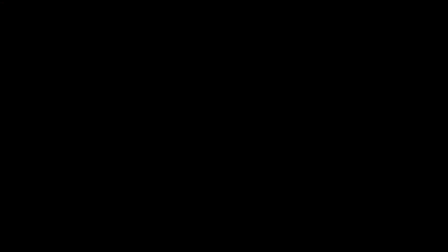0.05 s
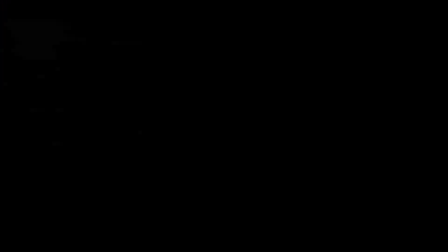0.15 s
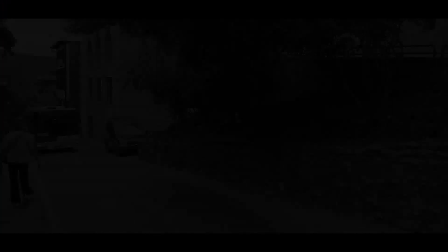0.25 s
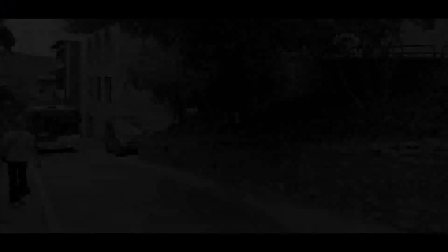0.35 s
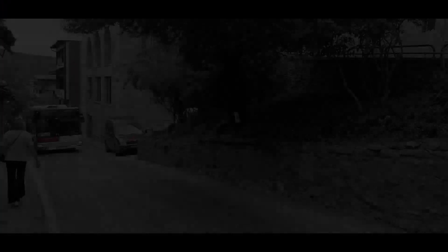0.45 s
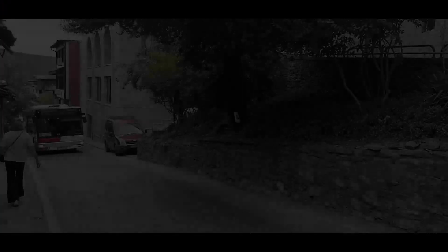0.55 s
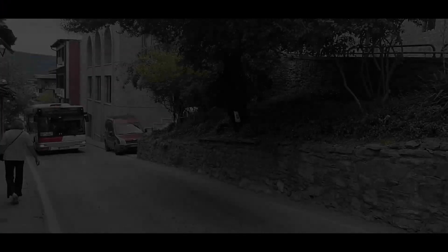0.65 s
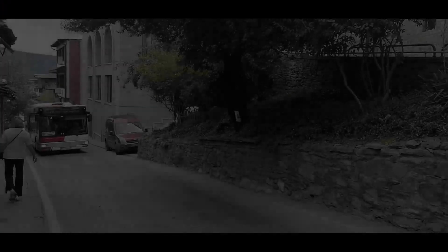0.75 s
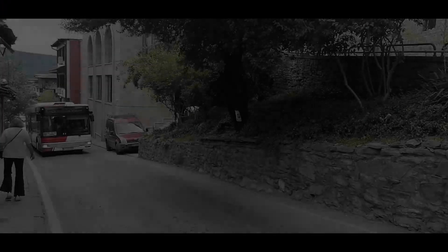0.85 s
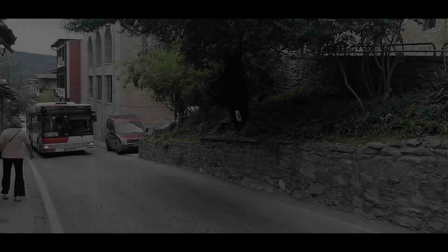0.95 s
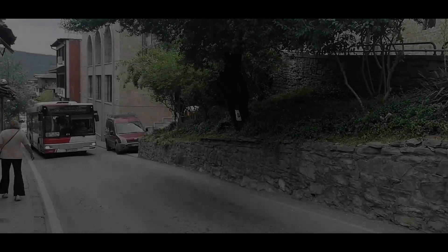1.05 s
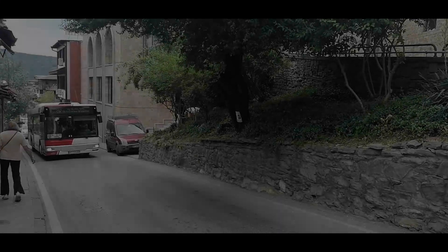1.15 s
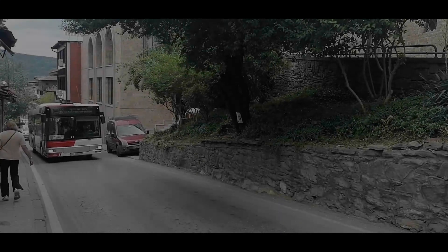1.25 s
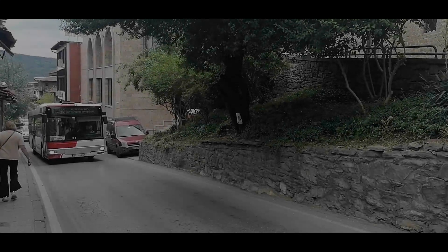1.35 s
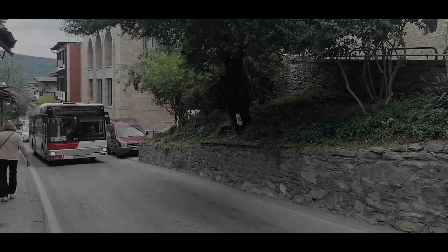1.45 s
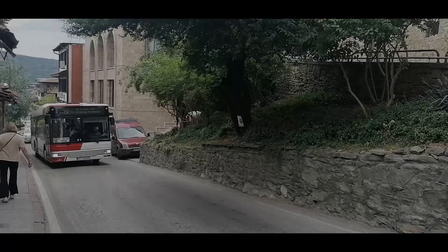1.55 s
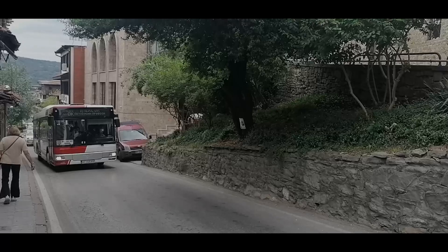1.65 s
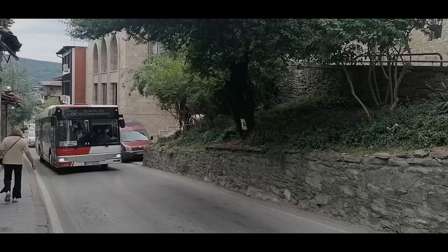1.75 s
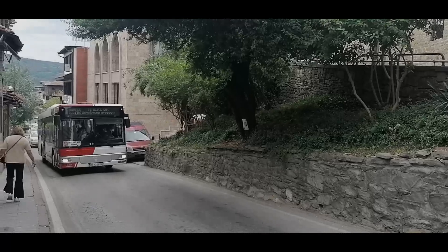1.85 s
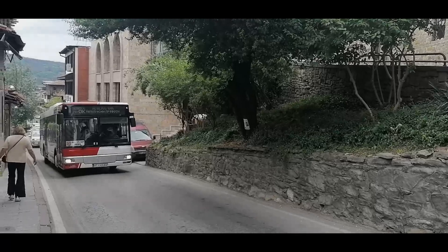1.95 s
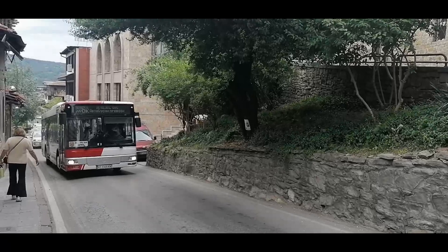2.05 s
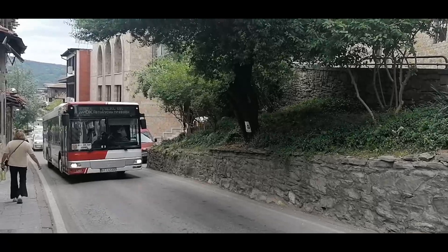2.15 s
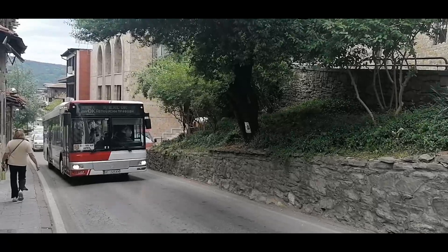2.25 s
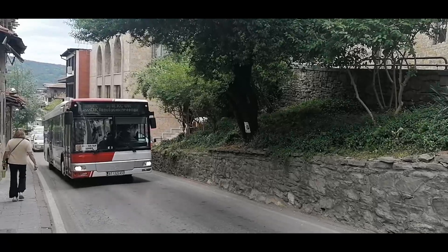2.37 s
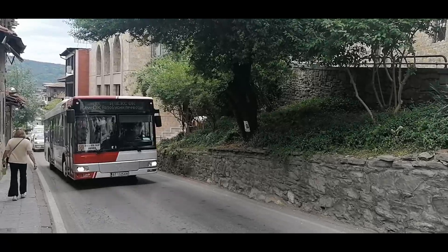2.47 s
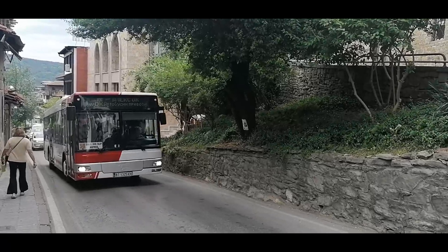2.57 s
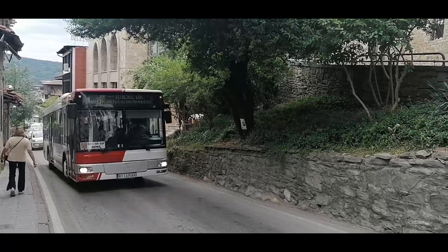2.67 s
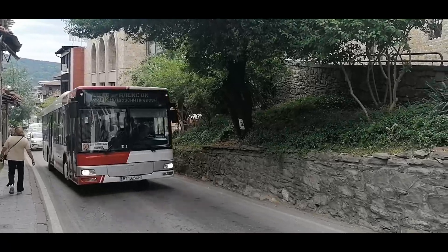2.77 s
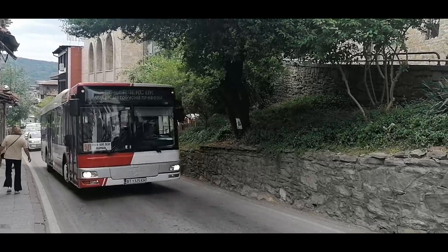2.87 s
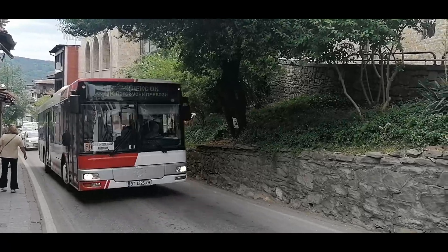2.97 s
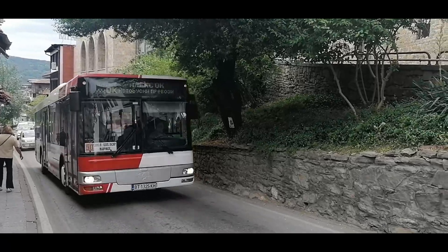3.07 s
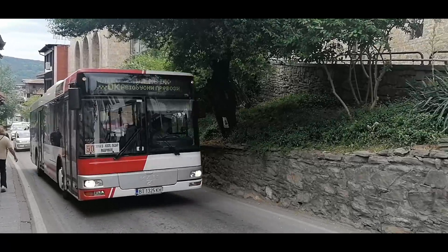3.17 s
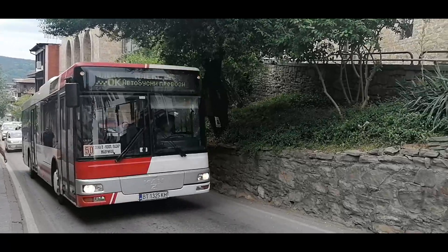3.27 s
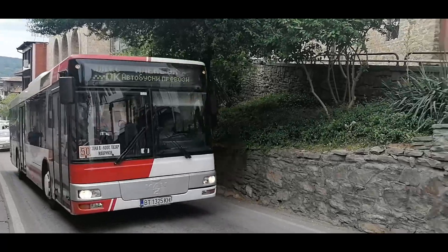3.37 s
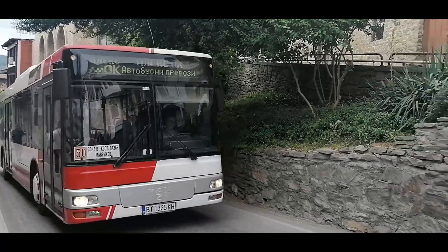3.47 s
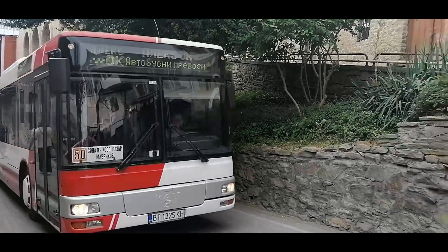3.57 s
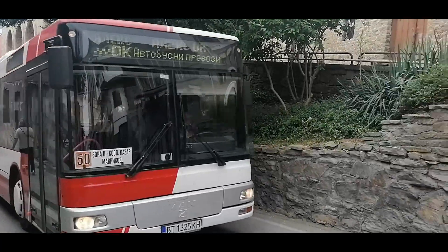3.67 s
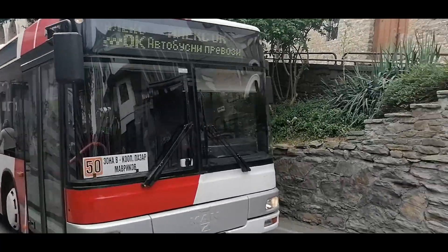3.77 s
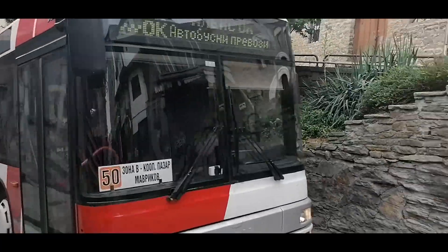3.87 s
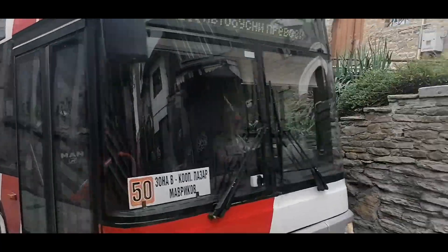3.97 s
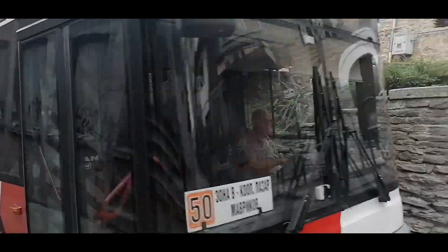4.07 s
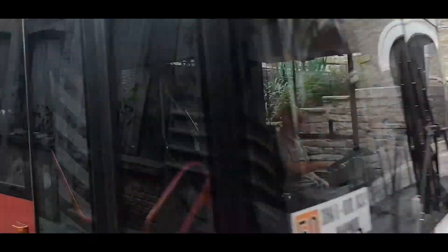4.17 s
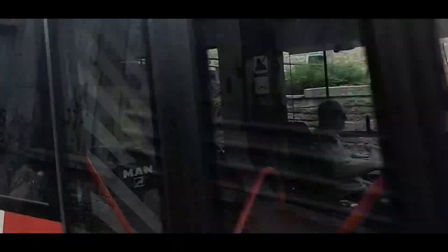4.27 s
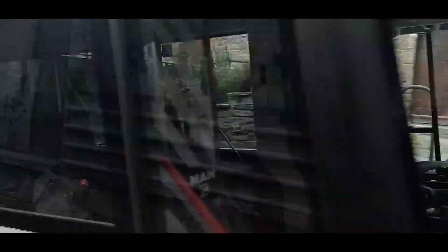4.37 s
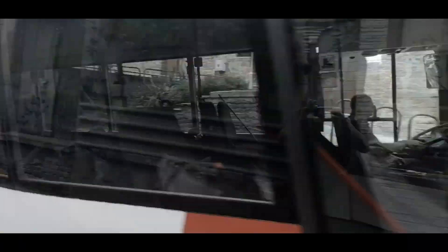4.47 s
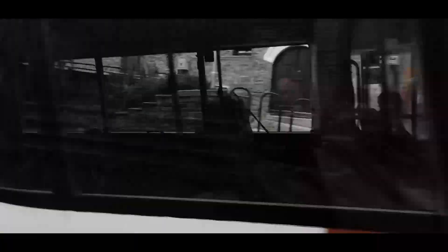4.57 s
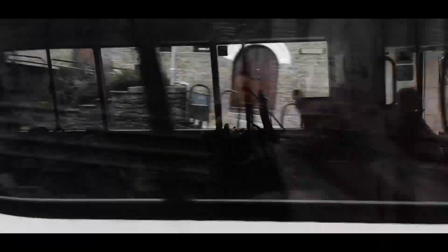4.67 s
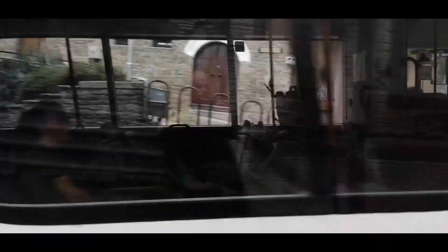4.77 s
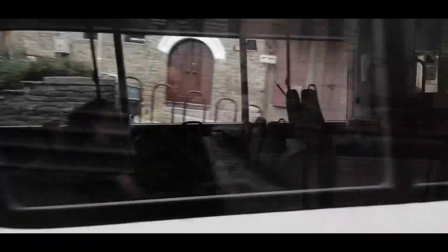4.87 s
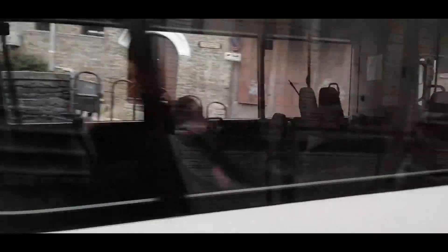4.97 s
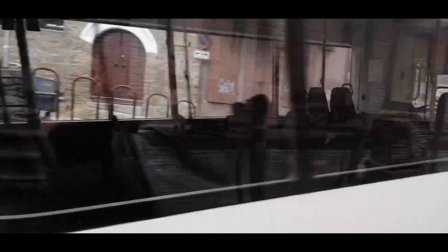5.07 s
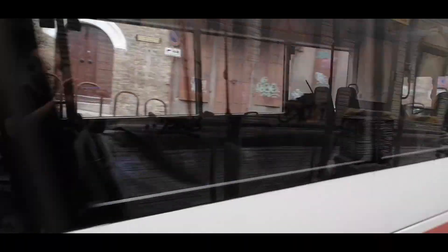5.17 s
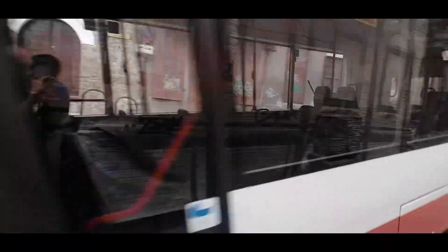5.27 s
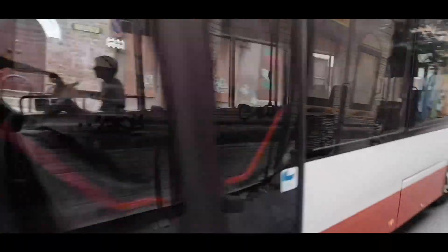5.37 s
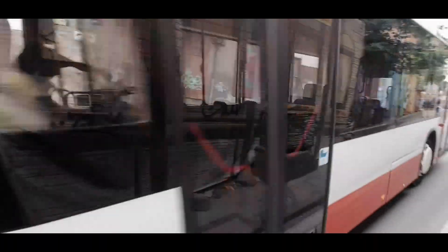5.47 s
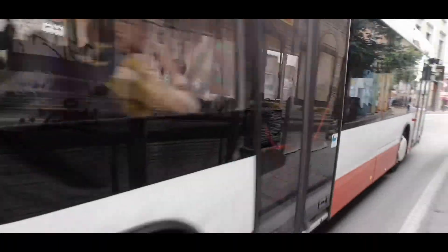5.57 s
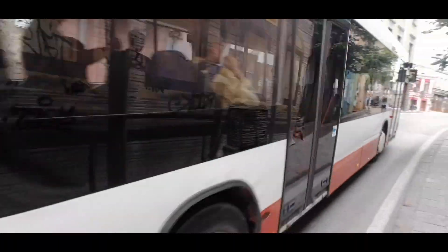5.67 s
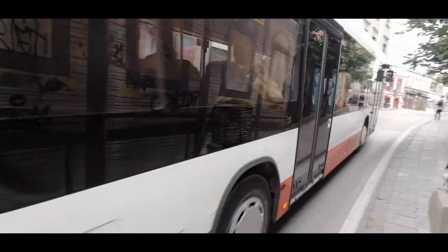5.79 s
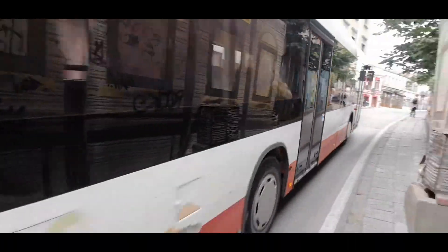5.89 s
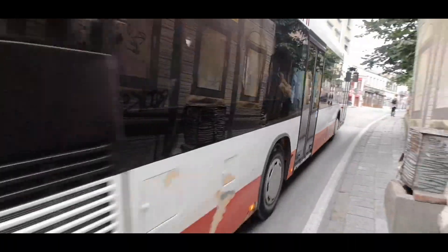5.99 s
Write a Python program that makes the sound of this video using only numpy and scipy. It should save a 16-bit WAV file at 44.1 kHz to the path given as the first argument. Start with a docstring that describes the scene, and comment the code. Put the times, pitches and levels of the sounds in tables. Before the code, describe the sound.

From silence, the sound fades in gradually over the first three seconds. A diesel city bus approaches on a narrow walled street, mostly to the left, above very faint steady traffic. Its wavering exhaust drone rises in pitch until about 2 s, with a rising fan hum, a thin high whistle and intake hiss. A low labouring roar and blurred gear tones peak near 2.3 s; at 2.6 s the engine eases and drops in pitch for an upshift, with faint air spits. Stronger short spits come at 3.4 and 3.7 s. Hollow body thuds fall near 2.5, 3 and 4 s, and small diesel knocks around 4.6 and 5.1 s. From 4 s the side slides past closely: boom, mid roar, clatter, tyre hiss and panel drone grow. By 5.5 to 6 s the rear grille's rasp and a sinking fan howl are loudest, more centred, then it stops abruptly but softly.

```python
"""A diesel city bus nears along a narrow walled street, fading in from silence with faint, steady distant noise.
Exhaust and fan hum, the turbo whistles; a labouring roar and gear tones swell before the upshift, with faint
spits of air; stronger spits come about a second after. Clatter, rasp and tyre hiss grow with the nearing rear.
Tones are wavering shaft orders, roars are coloured noise; sliding wall echoes comb the roars.
Two microphone ports hear it, the left one first and mostly louder."""
import sys
import numpy as np
from scipy import signal
from scipy.fft import rfft, irfft
from scipy.io import wavfile
from scipy.ndimage import uniform_filter1d, minimum_filter1d, map_coordinates

SR = 44100
rng = np.random.default_rng(int(sys.argv[2]) if len(sys.argv) > 2 else 0)


def master_out(mix):
    """Clip the mix to full scale and print it as 16-bit PCM to the path in sys.argv[1]."""
    frames = np.transpose(np.atleast_2d(mix))
    ceiling = np.clip(frames, -1, 1)
    pcm = np.round(ceiling * 32767).astype(np.int16)
    wavfile.write(sys.argv[1], SR, pcm)


N = 265923
TIME = np.arange(N) / SR
BINS = np.fft.rfftfreq(N, 1 / SR)


def undb(db):
    """Decibels to gain."""
    return 10 ** (np.asarray(db) / 20)


def curves(table):
    """Each column of a table, joined by straight lines in time."""
    s, *columns = np.transpose(table)
    return [np.interp(TIME, s, c) for c in columns]


def along(points):
    """Points joined on a log-frequency axis."""
    hz, value = np.transpose(points)
    return np.interp(np.log(np.maximum(BINS, 1)), np.log(hz), value)


def walk(rate_hz):
    """Smooth chance that changes about rate_hz times a second; spread 1."""
    knots = rng.standard_normal(4096)
    size = max(int(SR / rate_hz), 1)
    y = uniform_filter1d(np.interp(TIME * rate_hz, np.arange(len(knots)), knots), size)
    return y / y.std()


def turns(hz):
    """Phase in radians of something that turns hz times a second."""
    return 2 * np.pi * np.cumsum(hz) / SR


# port balance: (frequency [Hz], left minus right [dB])
BALANCE_DB = [(60, 7), (110, 7.2), (200, 8), (275, 9.9), (370, 10), (690, 9.5), (1150, 3.9), (1700, 4.2),
              (2900, -1), (4000, 0), (5000, -3), (7000, 0.5), (8700, 4.3), (11000, -.5), (14000, .5)]
# port likeness: (frequency [Hz], likeness [0-1])
LIKENESS = [(100, .975), (290, .975), (420, .9), (550, .77), (720, .8), (950, .6), (1700, .62), (1950, .3),
            (2400, .36), (3100, .15), (12000, .15)]
# lag of the right port: (frequency [Hz], lag [ms])
PORT_LAG_MS = [(300, .18), (500, .25), (900, .25), (1100, .33), (1800, .34), (2500, .39), (6000, .38)]


def ports(direct, scattered, colour=1):
    """Sound reaches the left port first; the walls make the treble unlike on the two sides. Level 1."""
    like = np.clip(along(LIKENESS), 0, 1)
    left = rfft(direct)
    delay = np.exp(-2j * np.pi * BINS * along(PORT_LAG_MS) / 1000)
    right = like * left * delay + np.sqrt(1 - like ** 2) * rfft(scattered)
    lean = undb(along(BALANCE_DB))
    pair = irfft(np.array([left * lean, right]) * colour / np.hypot(lean, 1), N)
    return pair / pair.mean(axis=0).std()


def rush(points, envelope):
    """Turbulence under an envelope, coloured and heard at both ports."""
    inside = (BINS > points[0][0]) & (BINS < points[-1][0])
    direct, scattered = rng.standard_normal((2, N)) * envelope
    return ports(direct, scattered, undb(along(points)) * inside)


def hum(phase, lines, waver, rate_hz):
    """Whole and half orders of one shaft; shifting reflections make each waver in strength and phase."""
    out = 0
    for order, db in lines:
        angle = np.round(2 * order) / 2 * phase
        in_phase = np.cos(angle) * (1 + waver * walk(rate_hz))
        quadrature = np.sin(angle) * waver * walk(rate_hz)
        out = out + undb(db) * (in_phase + quadrature)
    return out


def blurred_hum(phase, lines, waver, rate_hz):
    """Separately wavering hums as direct and scattered sound. Level 1."""
    direct, scattered = (hum(phase, lines, waver, rate_hz) for _ in range(2))
    return ports(direct, scattered)


def howl(table, rate_hz):
    """A tone wavers so fast that it rings as a narrow, moving band; rate_hz sets its width."""
    hz, db = curves(table)
    return blurred_hum(turns(hz), [(1, 0)], waver=3, rate_hz=rate_hz) * undb(db)


def bursts(table, rise_s, decay_s):
    """Envelope of sharp blows that peak at the given times and die away."""
    out = 0
    for s, db in table:
        rise = np.clip((TIME - s) / rise_s + 1, 0, 1)
        out = out + undb(db) * rise * np.exp(-np.maximum(TIME - s, 0) / decay_s)
    return out


SPEED_M_S, ABREAST_S, LANE_M = 4.99, 6.582, 3.71  # LANE_M: engine distance when abreast


def to_come():
    """Metres that the engine has yet to travel until it is abreast."""
    return SPEED_M_S * (ABREAST_S - TIME)


def distance():
    """Metres from the engine to the listener."""
    return np.hypot(to_come(), LANE_M)


# view of the engine grille: (time [s], 0 ahead - 1 side on)
SIDE_ON = [(0, 0.034), (2.4, 0.085), (3.5, 0.066), (4.1, 0.88), (5.2, 1), (6.03, 0.94)]


def passing(table, sound):
    """A sound changes from its colour heard from ahead to that heard from the side."""
    side = np.clip(curves(SIDE_ON)[0], 0, 1)
    rows = np.array(table)
    return np.sqrt(1 - side) * sound(rows[:, [0, 1]]) + np.sqrt(side) * sound(rows[:, [0, 2]])


def roar(table, envelope):
    """Turbulence on the moving bus."""
    return passing(table, lambda points: rush(points, envelope))


# part: (abreast [dB], loss per doubling of distance [dB], hidden by the bus from ahead [dB])
CARRY = {"rasp": (-28, 4.27, 0), "boom": (-16, 5.6, 1.26), "bay": (-18.5, 5.34, 7.1),
         "overtones": (-21.5, 5.87, 5), "clatter": (-26, 4.93, 5.7), "tyres": (-36.5, 5.93, 3.1),
         "intake": (-49.5, 2.34, 0)}


def carried(part):
    """Gain of one part: it grows as the bus nears and as its side comes into view."""
    db, doubling_db, hidden_db = CARRY[part]
    return undb(db - doubling_db * np.log2(distance() / LANE_M) - hidden_db * (1 - curves(SIDE_ON)[0]))


FLARE_S, FLARE_WIDTH_S, FLARE_DB = 2.27, 0.27, 0.5
SHIFT_S, EASE_S, EASE_DB = 2.58, 0.25, 1.5  # middle of the gear change


def flaring():
    """How near the engine is to the top of the gear, 0-1."""
    return np.exp(-((TIME - FLARE_S) / FLARE_WIDTH_S) ** 2)


def throttle():
    """The engine flares at the top of the gear and eases off briefly for the change."""
    return undb(FLARE_DB * flaring() - EASE_DB * np.exp(-((TIME - SHIFT_S) / EASE_S) ** 2))


# engine speed: (time [s], firing rate [Hz])
ENGINE = [(0, 74.4), (.35, 75.1), (.9, 81.35), (1.4, 83.15), (2.0, 86.43), (2.35, 84.9), (2.65, 75.84),
          (2.95, 68.1), (3.5, 67.73), (4.3, 68.9), (5.2, 69.25), (6.03, 69.45)]


def firing_phase():
    """Firing phase in radians, three firings a crank turn, slightly unsteady."""
    return turns(curves(ENGINE)[0] * (1 + 0.003257 * walk(8)))


def knocks(firing, sharpness):
    """Every firing shakes the block with its own strength, sinking towards the next."""
    cycle = firing / (2 * np.pi)
    strength = undb(4 * rng.standard_normal(1024))
    return 1 + sharpness * strength[cycle.astype(int)] * np.exp(-(cycle % 1) / 0.58)


# cars following far behind: (frequency [Hz], relative level [dB/Hz])
TRAFFIC = [(250, 13), (320, -6), (420, -32), (700, 6.5), (1000, 10), (1300, -8), (1800, -10), (3000, -15),
           (5000, -34)]
TRAFFIC_DB = -45


def traffic():
    """Steady coloured noise of the cars following far behind."""
    return rush(TRAFFIC, 1) * undb(TRAFFIC_DB)


# (time [s], firing line [dB], its octave [dB]), before the trims below
EXHAUST = [(0.28, -36, -37), (0.46, -23, -36), (0.61, -47, -53.0), (0.73, -27, -55), (0.94, -48, -48),
           (1.42, -28.5, -42), (1.54, -60, -47), (1.66, -29, -38), (1.87, -44, -37), (1.99, -26, -35),
           (2.12, -38, -35), (2.26, -20.5, -35.5), (2.46, -38.5, -41), (2.65, -30, -58), (2.77, -55, -37.0),
           (3.1, -41, -38), (3.4, -27.5, -37.5), (3.52, -46, -43), (3.73, -27, -42), (4.0, -39, -35.5),
           (4.06, -34, -34.5), (4.63, -37.5, -37.5), (4.72, -28, -32.5), (4.96, -34.5, -42),
           (5.17, -36, -43), (5.98, -40, -25)]
DRONE_TRIM_DB, OCTAVE_TRIM_DB = -2, 0.5
# crank lines: (order [x crank rate], moving off [dB], after the change [dB])
CRANK = [(1, -53, -57), (2, -55, -54.5), (4, -43.5, -45.5), (4.5, -34, -47), (5, -49, -48), (8, -44, -41)]
MOVING_OFF_S = 0.46


def exhaust(firing):
    """The firing line and its octave drone over crank lines, whose pattern shifts up to the gear change."""
    shifted = np.clip((TIME - MOVING_OFF_S) / (SHIFT_S - MOVING_OFF_S), 0, 1)
    crank = firing / 3
    crank_lines = [(order, pulling + shifted * (cruising - pulling)) for order, pulling, cruising in CRANK]
    first, octave = curves(EXHAUST)
    firing_lines = [(1, first + DRONE_TRIM_DB), (2, octave + OCTAVE_TRIM_DB)]
    drone = hum(firing, firing_lines, waver=.22, rate_hz=24)
    drone = np.sqrt(2) * (drone + hum(crank, crank_lines, waver=.7, rate_hz=22))
    return ports(drone, drone) * drone.std()


# cooling fan: (time [s], blade rate [Hz])
FAN = [(0, 213.5), (.3, 224), (.6, 235.5), (.95, 244.6), (1.3, 246), (1.65, 256.9), (2, 264.1),
       (2.35, 264.3), (3.05, 266.9), (3.75, 268.9), (4.1, 270), (4.8, 270.1), (5.15, 271.4), (5.5, 269.2),
       (5.85, 266.3), (6.03, 259.8)]
# blade tone, before HUM_TRIM_DB: (time [s], level [dB])
HUM = [(0.28, -29.5), (0.49, -45), (0.76, -33.5), (0.85, -51), (0.94, -33), (1.54, -36), (1.6, -32.5),
       (1.81, -35.5), (1.87, -28.5), (2.35, -40.5), (2.47, -26), (2.59, -45), (2.77, -25), (2.89, -28),
       (2.98, -36), (3.07, -27), (3.13, -31.5), (3.4, -23.5), (3.46, -35), (3.55, -23.5), (3.64, -25.5),
       (3.79, -21.5), (3.88, -43), (3.98, -30), (4.21, -33), (4.29, -21), (4.75, -38), (4.99, -16.5),
       (5.08, -18), (5.17, -26), (5.26, -14.5), (5.38, -32.5), (5.62, -17.5), (5.98, -25.5)]
HUM_TRIM_DB = -0.5
# overtones: (order [x blade rate], ahead [dB], side [dB]), before carry and trim
FAN_LINES = [(2, -10.5, -6.5), (3, -15, -9), (4, -15, -13), (5, -10.5, -36), (6, -29, -14.5), (7, -38, -19),
             (8, -40, -16.5), (9, -32, -16), (10, -45, -22), (12, -26, -26)]
# overtone trim, constant: (time [s], level [dB])
OVERTONE_TRIM = [(5.3, -1.5), (5.8, -1.5)]
# octave that sings out around the gear change: (time [s], level [dB])
FAN_OCTAVE = [(1.9, -68), (2.25, -50), (2.6, -49), (2.75, -46), (3.05, -45.5), (3.25, -65), (4, -74)]


def fan():
    """The blade tone carries round the bus; its overtones come out of the grille with the engine bay's roar."""
    blades = turns(curves(FAN)[0] * (1 + .0035 * walk(14)))
    tone = hum(blades, [(1, 0)], waver=.33, rate_hz=55)
    octave = hum(blades, [(2, 0)], waver=.55, rate_hz=30)

    def overtones(lines):
        """The overtones as the two ports hear them, at their summed power."""
        return blurred_hum(blades, lines, waver=1.1, rate_hz=26) * np.linalg.norm(undb(lines[:, 1]))

    grille = passing(FAN_LINES, overtones) * carried("overtones") * undb(curves(OVERTONE_TRIM)[0])
    low = ports(tone, tone) * undb(curves(HUM)[0] + HUM_TRIM_DB)
    return low + ports(octave, octave) * undb(curves(FAN_OCTAVE)[0]) + grille


# (time [s], centre [Hz], level [dB])
HOWL = [(0, 300, -39.5), (2.3, 305, -51), (3.3, 318, -31.5), (3.9, 308.4, -31), (4.4, 300, -48),
        (5.35, 285, -39), (5.6, 262, -22), (5.9, 236.2, -22), (6.03, 240, -19.5)]


def fan_howl():
    """Churned air howls roughly round the fan tone, sinking as the rear draws level."""
    return howl(HOWL, rate_hz=55)


# (time [s], centre [Hz], level [dB])
WHINE = [(1, 2150, -55), (2.3, 2360, -58), (2.8, 2411, -52), (3.1, 2500, -53), (3.6, 2507, -54),
         (4.3, 2452, -49), (5.2, 2400, -50), (6.03, 2380, -48)]


def transmission_whine():
    """Transmission teeth whine in a blurred, drifting band."""
    return howl(WHINE, rate_hz=230)


# (frequency [Hz], ahead [relative dB/Hz], side [relative dB/Hz])
RUMBLE = [(12, -32, -4), (24, -2, 7.5), (45, -0.5, 9), (65, 4, 4.5), (92, -3.5, 3.5), (114.1, 3.5, 6.5),
          (145, -3.5, 11.5), (228, -26, -26)]
# (time [s], level [dB])
RUMBLE_DB = [(0, -54), (1.1, -45), (1.22, -35.5), (1.7, -36.5), (2.2, -34), (2.8, -32.5), (3.3, -35.5),
             (4.3, -28), (5.1, -27.5), (6.03, -27.5)]


def rumble():
    """Deep turbulence of the bus."""
    return roar(RUMBLE, 1) * undb(curves(RUMBLE_DB)[0])


def lope(firing):
    """The boom flutters unevenly, about once a crank turn."""
    crank = firing / 3 + 1.2 * walk(9)
    return undb(1.8 * np.cos(crank) + 1.0 * walk(35))


# (frequency [Hz], ahead [relative dB/Hz], side [relative dB/Hz])
BOOM = [(100, -40, -16), (144, 1, -7.5), (172, 6, -4), (203, 1, -2), (239, 6.5, 3.5), (312, -1, 1.5),
        (347, -1.5, 0), (396, -9.5, -2.5), (503, -28, -33), (670, -40, -38)]


def boom(firing, shake):
    """Low noise shaken by the firings and fluttering with the crank."""
    return roar(BOOM, shake) * carried("boom") * lope(firing)


# (frequency [Hz], ahead [relative dB/Hz], side [relative dB/Hz])
BAY = [(281, -43, 11), (370, -1, -8), (427, -1, 6.5), (465, 3, 8.5), (560, -2, 5), (625, 4, 4),
       (626, 3.5, 4), (805, 3.5, 7), (860, -1, 2.5), (990, -3.5, 2.5), (1285, -21, -2.5), (1756, -6, -32)]


def engine_bay(shake):
    """Mid-range roar of the engine bay, shaken by the firings."""
    return roar(BAY, shake) * carried("bay")


def gear_whine(firing, whine_db=-15):
    """The teeth of the timing gears mesh 64 times a crank turn, blurred into a wavering band."""
    mesh = firing * 64 / 3
    return undb(whine_db) * blurred_hum(mesh, [(1, 0)], waver=3, rate_hz=190)


# (frequency [Hz], ahead [relative dB/Hz], side [relative dB/Hz])
CLATTER = [(925, -50, -11), (1095, 6.5, 0), (1540, 6.5, 6), (1690, -4.5, 1.5), (2000, 2, 2),
           (2260, -5, 1.5), (2450, -2, 0.5), (2980, -7.5, -3.5), (3400, -13.5, -6.5), (3790, -13, -8),
           (5440, -39, -53)]


def clatter(firing, shake):
    """Gritty noise shaken by the firings, with the timing gears' whine."""
    grit = undb(.6 * walk(110))
    return (roar(CLATTER, shake * grit) + gear_whine(firing)) * carried("clatter")


# (frequency [Hz], ahead [relative dB/Hz], side [relative dB/Hz])
TYRES = [(2750, 8, -25), (3960, 1.5, 1), (4630, 1.5, 1), (5600, -1, 0), (5940, -3.5, -1.5),
         (7440, -3, -2.5), (8350, -10, -11), (9160, -5.5, -6), (10560, -14, -15.5), (11700, -16, -17.5),
         (15000, -35, -30)]


def tyres():
    """Tyre hiss: bright noise with a slight unsteadiness."""
    return roar(TYRES, undb(0.079 * walk(19.83) + .5 * walk(160))) * carried("tyres")


# whistle: (time [s], frequency [Hz], level [dB])
TURBO = [(.3, 8400, -86.5), (.6, 9050, -76), (.87, 9440, -69.5), (1.03, 9850, -79), (1.27, 10450, -80),
         (1.6, 11100, -79), (2.2, 11500, -90), (2.8, 10800, -130)]
# intake hiss: (frequency [Hz], relative level [dB/Hz])
INTAKE = [(3200, -1), (4800, 7), (6800, -1.5), (8200, -23), (10500, -13), (14500, -33)]
SPOOL_S, SPOOL_WIDTH_S, SPOOL_DB = 1.25, 0.18, 2.5  # half way, width, how much weaker the hiss starts


def turbo(rundown_s=0.2):
    """A thin, unsteady whistle climbs while the engine pulls; the intake hisses until just after the change."""
    hz, db = curves(TURBO)
    blades = turns(hz * (1 + .013 * walk(200)))
    whistle = blurred_hum(blades, [(1, 0)], waver=1.5, rate_hz=400) * undb(db)
    spooling = undb(-SPOOL_DB * (1 - np.tanh((TIME - SPOOL_S) / SPOOL_WIDTH_S)) / 2)
    boost = spooling * np.exp(-np.maximum(TIME - SHIFT_S, 0) / rundown_s)
    return whistle + rush(INTAKE, 1) * boost * carried("intake")


# (time [s], pitch [Hz], level [dB], Gaussian half-width [s])
THUDS = [(1.233, 307, -36.5, 0.055), (2.501, 299, -27.5, 0.017), (2.961, 185, -29.5, 0.041),
         (3.926, 294.2, -26, 0.017), (4.037, 268.7, -23, 0.021), (5.177, 69.6, -25.5, 0.031)]


def body_thuds():
    """The hollow body answers bumps with short, low thuds."""
    thuds = 0
    for s, hz, db, width_s in THUDS:
        tone = np.sqrt(2) * np.cos(2 * np.pi * (hz * TIME + rng.random()))
        thuds = thuds + undb(db) * np.exp(-((TIME - s) / width_s) ** 2) * tone
    return ports(thuds, thuds) * thuds.std()


# (time [s], level [dB])
ENGINE_KNOCKS = [(1.47, -29), (1.722, -27.5), (2.518, -31), (4.02, -27), (4.634, -20.5), (4.674, -23),
                 (5.092, -22.5)]
# (frequency [Hz], relative level [dB/Hz])
KNOCK_COLOUR = [(350, -4), (600, 8), (950, 2), (1500, -8.5), (2600, -20.5), (4500, -28)]


def engine_knocks():
    """A few faint, short mid-range knocks of the diesel: bursts of coloured noise."""
    return rush(KNOCK_COLOUR, 1) * bursts(ENGINE_KNOCKS, rise_s=.001, decay_s=.006)


# (frequency [Hz], relative level [dB/Hz])
LABOUR = [(60, -29), (85, 14), (110, 5), (135, 8), (170, -6), (215, -3), (300, -24), (420, -25), (560, -4),
          (700, -10), (900, -32)]
LABOUR_DB, LABOUR_S, LABOUR_WIDTH_S = -30.5, 2.324, 0.53


def labour():
    """A low roar builds under load and dies with the gear change."""
    return rush(LABOUR, 1) * undb(LABOUR_DB) * np.exp(-((TIME - LABOUR_S) / LABOUR_WIDTH_S) ** 2)


# (order [x crank rate], level [dB])
GEARBOX = [(18.5, -44), (49.5, -45), (67, -49.5)]


def gearbox(firing):
    """Blurred gear tones sing out just before the change."""
    tones = blurred_hum(firing / 3, GEARBOX, waver=3, rate_hz=130)
    return tones * np.linalg.norm(undb(np.array(GEARBOX)[:, 1])) * flaring()


# (time [s], level [dB], decay [s])
SPITS = [(2.289, -65, 0.074), (2.41, -70, .04), (3.43, -61.5, .06), (3.702, -49, 0.006), (3.71, -61, .2)]
# (frequency [Hz], relative level [dB/Hz])
AIR = [(3000, -15), (6000, -8), (9300, 11), (12000, 2), (15000, -12)]
SPIT_RISE_S = 0.0046


def air_valve():
    """Compressed air escapes in short bright spits."""
    return rush(AIR, 1) * sum(bursts([(s, db)], SPIT_RISE_S, decay_s) for s, db, decay_s in SPITS)


# (time [s], centre [Hz], level [dB])
PANEL_DRONE = [(2.6, 385.2, -62), (3.3, 369.2, -39), (3.9, 382, -41), (4.4, 390, -44), (4.7, 392, -33),
               (5.15, 393, -32.5), (5.45, 385, -32), (5.7, 380, -59)]


def panel_drone():
    """A panel of the engine bay drones in a narrow band as it goes by."""
    return howl(PANEL_DRONE, rate_hz=30)


# (time [s], centre [Hz], level [dB])
LOW_BAND = [(3.3, 179.7, -69), (3.85, 182.4, -35), (4.2, 188, -30), (4.5, 187.1, -27.5), (4.9, 190, -52)]


def low_band():
    """A narrow low band near 185 Hz swells and dies."""
    return howl(LOW_BAND, rate_hz=55)


# (frequency [Hz], relative level [dB/Hz])
RASP = [(900, -14), (1300, -6), (1800, -7), (2400, 6.5), (3100, 8.5), (3700, 0), (4300, -3), (6000, -3.5),
        (8300, -15), (10500, -13.5), (14500, -36)]
RASP_BEAM_M = 5.37  # half-width


def rasp(shake):
    """The grille beams a bright rasp sideways, heard only as the engine draws level."""
    return rush(RASP, shake) * carried("rasp") * np.exp(-(to_come() / RASP_BEAM_M) ** 2)


# (distance beyond the lane [m], echo [dB])
WALLS = [(1.4, -20.5), (3.6, -23.5)]


def wall_echoes(pair):
    """Echoes off the walls lag more as the bus nears, so a comb slides through its roar."""
    for wall_m, echo_db in WALLS:
        detour_m = np.hypot(to_come(), LANE_M + 2 * wall_m) - distance()
        lag = detour_m / 343 * SR  # samples
        echo = np.array([map_coordinates(sound, [np.arange(N) - lag], order=3) for sound in pair])
        pair = (pair + undb(echo_db) * echo) / np.hypot(1, undb(echo_db))
    return pair


# extra lean to the left at full share: (time [s], bass [dB], upper middle [dB])
LEAN = [(0.3, 1.5, 5), (1.7, 1, 2.5), (2.3, 0, 6), (3.7, 0.5, 3.5), (4.6, 0.8, 3), (5.3, -0.5, 1),
        (6.03, -0.2, -3)]
# share of each frequency in the lean: (frequency [Hz], share [ratio])
LEAN_BASS = [(150, 1), (280, .5), (560, 1), (900, 0)]
LEAN_MIDDLE = [(400, 0), (560, .3), (900, 0), (1400, .5), (2500, 1.15), (4500, .8), (6500, .3), (9000, .3),
               (11000, 0)]


def leaning(pair):
    """The bus sits further to the left while it is ahead and evens out as it draws level."""
    bass_db, middle_db = curves(LEAN)
    spectrum = rfft(pair)
    for share, db in ((LEAN_BASS, bass_db), (LEAN_MIDDLE, middle_db)):
        pair = pair + irfft(spectrum * along(share), N) * (undb(np.array([db, -db]) / 2) - 1)
    return pair


def scene():
    """All parts of the bus over distant traffic; only the roars meet the walls."""
    firing = firing_phase()
    surge = undb(0.087 * walk(3.46))  # the brighter sources swell and sink together
    shake = knocks(firing, sharpness=.38)
    bright = engine_bay(shake) + clatter(firing, shake) + rasp(knocks(firing, sharpness=0.32))
    engine = (boom(firing, shake) + bright * surge) * throttle()
    tones = exhaust(firing) + fan() + fan_howl() + transmission_whine() + gearbox(firing)
    details = body_thuds() + engine_knocks() + panel_drone() + low_band()
    roars = wall_echoes(rumble() + labour() + engine + tyres() * surge)
    return leaning(tones + details + roars) + turbo() + air_valve() + traffic()


FADE_FROM_S, FADE_TO_S, FADE_BEND = 0.16, 3.04, 0.97  # bend 1 = straight
TOP_HZ = 14800


def record(dry):
    """The sound fades in from silence and stops softly; a limiter eases the tallest peaks; the top is cut."""
    fade = np.clip((TIME - FADE_FROM_S) / (FADE_TO_S - FADE_FROM_S), 0, 1) ** FADE_BEND
    stop = np.sin(np.pi / 2 * np.minimum((TIME[-1] - TIME) / .004, 1)) ** 2
    needed = .95 / np.maximum(np.abs(dry).max(axis=0), .95)
    gain = uniform_filter1d(minimum_filter1d(needed, size=301), size=301)
    low_pass = signal.ellip(10, .1, 80, TOP_HZ, fs=SR, output="sos")
    return signal.sosfilt(low_pass, dry * gain * fade * stop)


dry = scene()
out = record(dry)
master_out(out)
```